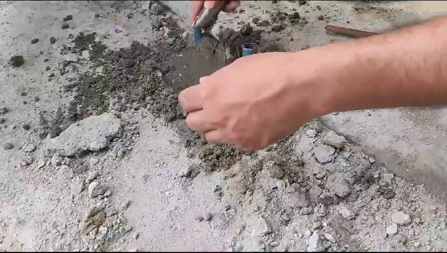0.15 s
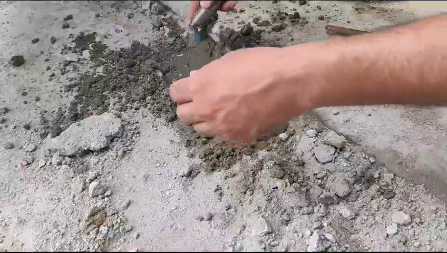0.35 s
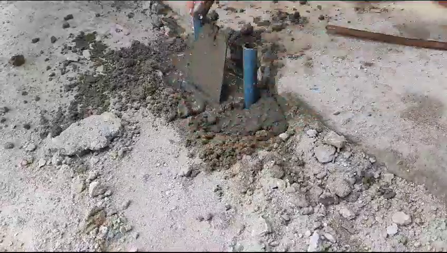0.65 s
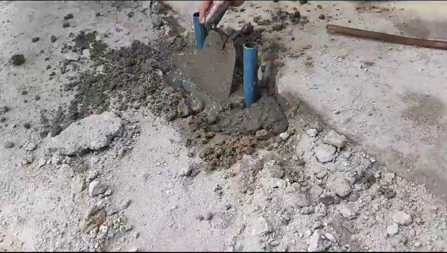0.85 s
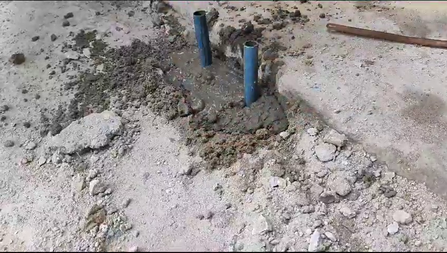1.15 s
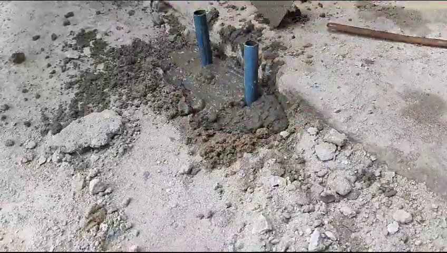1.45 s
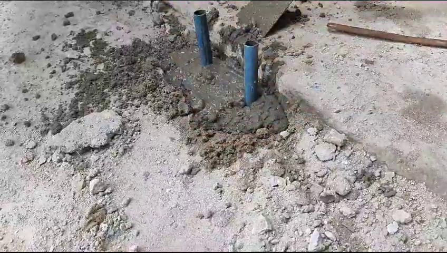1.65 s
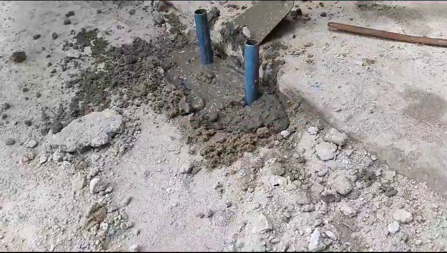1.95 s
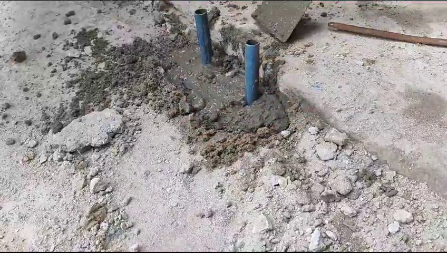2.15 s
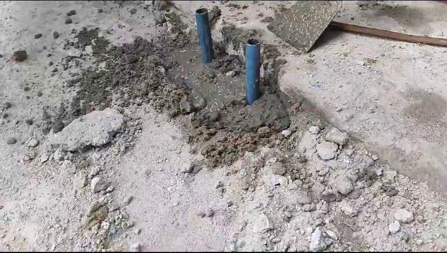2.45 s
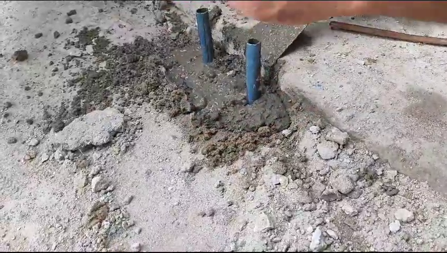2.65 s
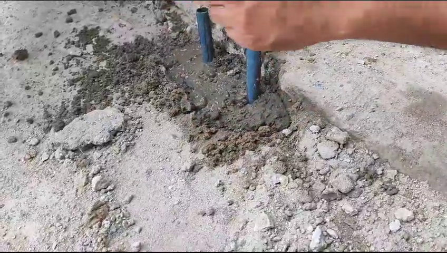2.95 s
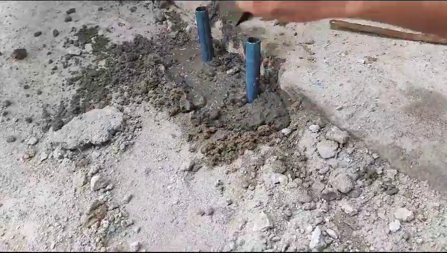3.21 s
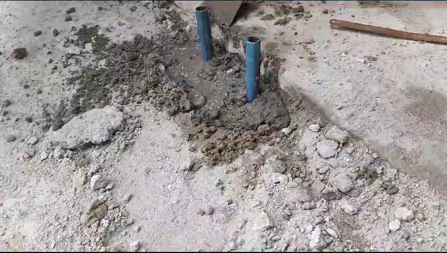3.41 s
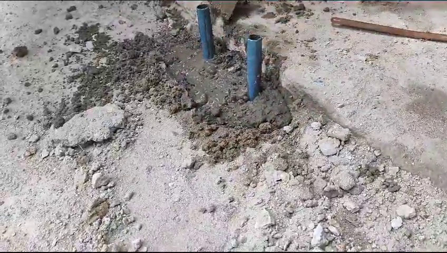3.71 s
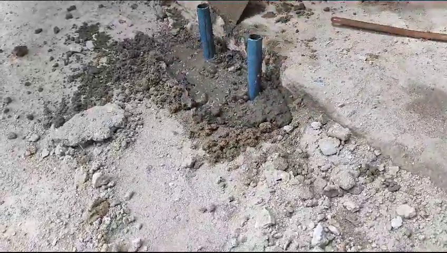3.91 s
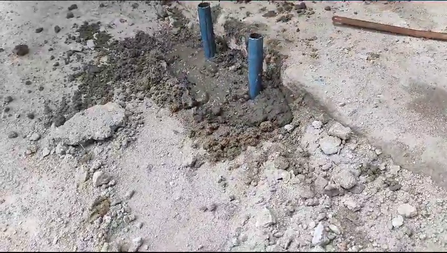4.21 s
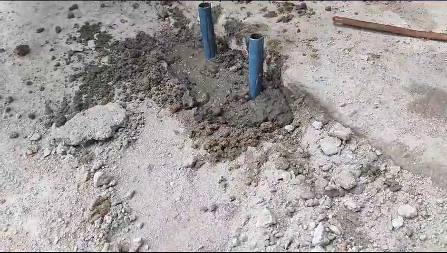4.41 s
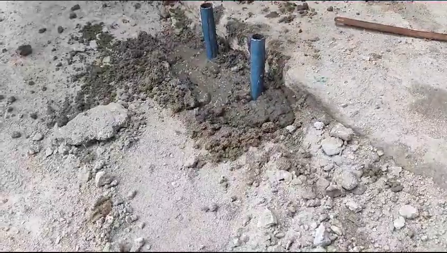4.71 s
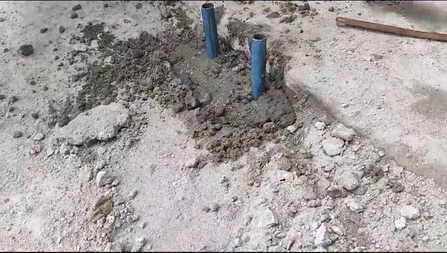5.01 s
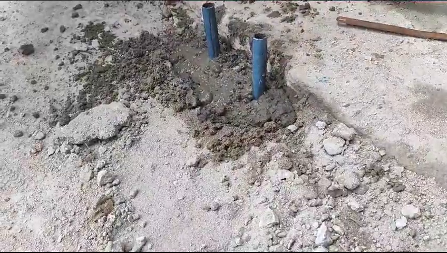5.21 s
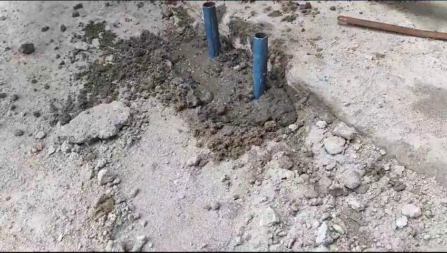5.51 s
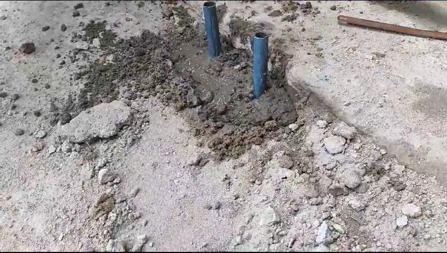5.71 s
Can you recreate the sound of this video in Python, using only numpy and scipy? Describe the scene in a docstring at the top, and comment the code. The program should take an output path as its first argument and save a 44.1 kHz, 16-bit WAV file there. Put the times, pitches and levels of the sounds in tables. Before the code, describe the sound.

Fine wet pats and sharp taps give way to ringing metal scrapes on concrete, then coarse scooping and hollow knocks in a tub.

```python
"""A small steel trowel pats wet mortar, scrapes a concrete floor, then scoops mortar in a tub.
Impulsive sand grains excite broad contact noise and the resonances of blade and tub; taps, lumps and
knocks are sharp pushes with decaying bursts. Narrow modes sing by stick and slip, and a hollow tone squelches.
Noise tails make a bare room; tiny clicks, microphone rumble, a brief hum and background air lie outside it."""
import sys
import numpy as np
from scipy import signal
from scipy.fft import rfft, irfft, next_fast_len
from scipy.io import wavfile
from scipy.ndimage import map_coordinates

SR = 44100
rng = np.random.default_rng(int(sys.argv[2]) if len(sys.argv) > 2 else 0)


def bounce(signal):
    """Save signal as a 16-bit WAV file at the path given by the first command-line argument."""
    frames = np.transpose(np.atleast_2d(signal))
    limited = np.clip(frames, -1, 1)
    pcm = np.round(limited * 32767).astype(np.int16)
    wavfile.write(sys.argv[1], SR, pcm)


N = 258426
SIZE = next_fast_len(N + SR)  # zero padding leaves room for ringing
HZ = np.fft.rfftfreq(SIZE, 1 / SR)
T = np.arange(N) / SR
SPLIT_HZ = 2800  # between the low body and the bright grit of a contact

# resonances of the steel blade: pitch_hz, half_width_hz, relative level_db
BLADE_MODES = [(588, 23, -1), (1069, 10.3, -14), (2208, 55, -5), (2623, 180, -6), (3180, 360, -8.5),
               (3458, 37, -4.5), (4125, 63, -5), (4886, 180, -1.5), (5200, 81, -16), (5595, 410, -5.5),
               (6993, 56, -1.5), (7760, 50, 0.5), (8000, 120, -32), (8760, 170, -5), (9950, 59, -10),
               (10690, 72, -4), (11350, 92, -9), (12100, 230, -11), (12800, 300, -27), (14000, 34, -28),
               (14480, 82, -6.5), (16400, 390, -6)]
# resonances of the tub: pitch_hz, half_width_hz, relative level_db
TUB_MODES = [(196, 190, -15), (630, 95, 8.5), (1574, 130, 1), (2145, 55, 1), (2703, 32, 0),
             (3120, 54, -8.5), (3543, 61, -5.5), (4180, 23, -7.5), (4710, 200, -25), (5440, 600, -8.5),
             (6000, 57, -3), (7800, 500, -10), (8360, 170, -7), (9630, 40, -43)]
# contact noise spectrum of wet mortar: frequency_hz, relative density_db (per Hz)
MORTAR_SPECTRUM = [(120, -29), (200, -11), (440, -14), (538, -3.5), (659, -12), (1080, -8), (1250, -9),
                   (2130, -7.5), (2470, -7), (2700, -4.5), (4520, -16.5), (7830, -2), (12200, -32.5),
                   (15100, -17), (16000, -11.5)]
# dull spectrum of a moving or falling load: frequency_hz, relative density_db (per Hz)
THUD_SPECTRUM = [(35, -45), (60, -22), (188, -3.5), (221, -8), (312, -7), (393, -19.5), (500, -12.5),
                 (650, -33), (1100, -120)]


def amp(db):
    """Amplitude ratio of a level in decibels."""
    return 10 ** (np.asarray(db) / 20)


def unit(x):
    """Power normalisation: scale to rms 1."""
    return x / np.sqrt(np.mean(np.abs(x) ** 2) + 1e-20)


def along(points, hz=HZ):
    """Logarithmic frequency scale: (Hz, value) points interpolated on it."""
    f, v = np.transpose(points)
    return np.interp(np.log(hz + 1), np.log(f + 1), v)


def wobble(rate):
    """Band-limited random modulation: a smooth curve through rate random knots a second."""
    knots = rng.standard_normal(int(N * rate / SR) + 4)
    return map_coordinates(knots, [T * rate])


def filtered(x, response):
    """Linear filtering: convolution is multiplication by a frequency response."""
    return irfft(rfft(x, SIZE) * response, SIZE)[..., :N]


def causal(gain):
    """Minimum phase: folding the cepstrum gives this gain a causal response, at unit power."""
    cepstrum = irfft(np.log(np.maximum(unit(gain), 1e-6)), SIZE)
    cepstrum[1:SIZE // 2] *= 2
    cepstrum[SIZE // 2 + 1:] = 0
    return np.exp(rfft(cepstrum))


def resonances(modes):
    """Modal superposition: powers of steep-skirted resonances add, normalised to unit power."""
    power = sum((amp(db) / (1 + ((HZ - centre) / half_width) ** 2)) ** 2 for centre, half_width, db in modes)
    return unit(np.sqrt(power))


def surface(spectrum, modes, ring_db):
    """Incoherent addition: broad contact noise plus the object's resonances."""
    return np.hypot(unit(amp(along(spectrum))), amp(ring_db) * resonances(modes))


def halves(gain, split_hz):
    """Crossover filtering: a gain parted into a low and a high response."""
    slope = (HZ / split_hz) ** 4
    return causal(gain / (1 + slope)), causal(gain * slope / (1 + slope))


def sand(rate, spread_db, hiss_db, judder_db):
    """Poisson-like shot noise: grains crushed at random, in clumps as the blade sticks and slips."""
    present = rng.random(N) < rate / SR  # rate is in grains per second
    sign = rng.choice([-1, 1], N)
    grains = present * sign * amp(spread_db * np.minimum(rng.exponential(size=N), 4))
    crackle = unit(grains) + amp(hiss_db) * rng.standard_normal(N)
    return unit(crackle * amp(judder_db * wobble(170)))


def pressure(table, ease_db, release):
    """Contact force envelope, one row a stroke: it bites, swells, eases off and lets go."""
    bite_s = 0.0032  # contact grows over this time before the start
    forces = []
    for start, swell, ease, swell_db, peak_db, *_ in table:
        t = T - start
        bite = np.clip(t / bite_s + 1, 0, 1)
        lift = np.exp(-np.clip((t - swell - ease) / release, 0, 20))
        below_peak_db = np.interp(t, [0, swell, swell + ease], [swell_db, 0, ease_db])
        forces.append(bite * lift * amp(peak_db - below_peak_db))
    return np.array(forces)


def strokes(force, grit_over_db, gain, grit, body_db, grit_db):
    """Source-filter principle: crushed grains drive the low body and the bright grit of a contact."""
    low, high = halves(gain, SPLIT_HZ)
    body_force = force.sum(axis=0)
    grit_force = amp(grit_over_db) @ force
    body = amp(body_db) * filtered(body_force * grit, low)
    bright = amp(grit_db) * filtered(grit_force * grit, high)
    return body + bright


def blows(times, levels, t60, crack_db):
    """Impulsive excitation: each blow is one sharp push and a short decaying burst of crushing."""
    out, t = np.zeros(N + SR), np.arange(SR // 5) / SR
    for s, db in zip(times, levels):
        at = round(s * SR)
        out[at:][:len(t)] += amp(db - 60 * t / t60) * rng.choice([-1, 1], len(t))
        out[at] += amp(db + crack_db)
    return out[:N]


def singing(force, song_db, modes):
    """Stick-slip excitation: friction along the blade keeps a few modes ringing."""
    slips = sand(rate=1500, spread_db=3, hiss_db=-8, judder_db=3.5)
    return filtered(amp(song_db) @ force * slips, causal(resonances(modes)))


def patting():
    """Damped granular contact: wet mortar fizzes finely under the flat blade and damps its ring."""
    # strokes: start_s, swell_s, ease_s, swell_db (below peak), drive peak_db, grit_db (over peak)
    pats = [ (0.0, 0.011, 0.097, -3, -52.5, -1.5), (0.144, 0.041, 0.011, 15, -42, -5.5),
            (0.22, 0.054, 0.006, 9, -56, 1), (0.398, 0.02, 0.021, 3.5, -41, 4.5),
            (0.45, 0.057, 0.046, 4, -63, 4.5), (0.759, 0.12, 0.071, 6.5, -49, -2),
            (0.905, 0.0094, 0.038, 6, -44, 1.5), (0.96, 0.056, 0.018, 4.5, -54, -1),
            (3.895, 0.011, 0.11, -1, -51.5, -5.5), (4.21, 0.025, 0.13, 0, -68, 1.5), ]
    force = pressure(pats, ease_db=12.5, release=0.0065)
    grit_over_db = np.transpose(pats)[-1]
    grit = sand(rate=3500, spread_db=1.5, hiss_db=-2.0, judder_db=0.0)
    gain = surface(MORTAR_SPECTRUM, BLADE_MODES, ring_db=-1.5)
    return strokes(force, grit_over_db, gain, grit, body_db=-2.5, grit_db=-2.0)


def air():
    """Partially correlated noise: one shared and two separate parts make the room's faint background."""
    # background spectrum: frequency_hz, relative density_db (per Hz)
    air_spectrum = [(15, -44), (25, -16), (102, -6), (153, -29.5), (236, -29), (1130, -41), (1650, -17),
                    (1890, -22.5), (2910, -21.5), (3620, -25), (16000, -42.5)]
    noise = rng.standard_normal(N) + 2.0 * rng.standard_normal((2, N))
    return amp(-69.0) * unit(filtered(noise, amp(along(air_spectrum))))


def humming():
    """Narrow-band resonance: filtered noise makes a faint hollow hum that stops early."""
    pitch_hz, level_db, end_s = 620, -77.5, 1.38
    hum = unit(filtered(rng.standard_normal(N), causal(resonances([(pitch_hz, 35, 0)]))))
    return amp(level_db) * hum * np.clip((end_s - T) / 0.05, 0, 1)


def handling():
    """Structure-borne noise: the grip shifts in soft lumps over a tremor, mostly on the right port."""
    # shifts of the grip: peak_s, drive level_db
    nudges = [(0.019, -42), (0.19, -45), (0.27, -46), (0.43, -49), (0.545, -44), (0.79, -45.5), (0.97, -45),
              (1.099, -48), (1.429, -38.5), (1.55, -42), (1.71, -47), (2.07, -49), (2.379, -46),
              (2.489, -42.5), (2.68, -51.5), (2.92, -55), (3.29, -51.5), (3.48, -57.5), (3.96, -53),
              (4.06, -52)]
    # handling spectrum: frequency_hz, relative density_db (per Hz)
    rumble_spectrum = [(12, -51), (20, -10.5), (91, 3), (119, -2), (138, -1), (166, -8.5), (211, -17.5),
                       (400, -27.5), (520, -66), (880, -120)]
    rise_s, fall_s = 0.018, 0.059  # exponential time constants
    grip = amp(-61 - 2 * T)  # the hand grows steadier by 2 dB a second
    for s, db in nudges:
        bump = np.exp(-np.maximum((s - T) / rise_s, (T - s) / fall_s))
        grip = np.maximum(grip, amp(db) * bump)
    noise = rng.standard_normal(N) + 1.78 * rng.standard_normal((2, N))
    lumps = unit(filtered(noise, amp(along(rumble_spectrum))) * amp(1.0 * wobble(25.14)))
    return lumps * grip * amp([[-7], [3]])  # left and right gains, dB


def tapping():
    """Impact excitation of modes: the blade's edge strikes stones in the mix."""
    # strikes: time_s, drive peak_db, body_db (relative to peak)
    taps = [(0.175, -27, 2), (0.1847, -28.5, 1), (0.6515, -40, 1), (0.6579, -20.5, -1.5), (0.9038, -29, -8),
            (1.5757, -43.5, 2), (1.6721, -24.5, -20), (1.8504, -40.5, 1), (2.0006, -32, -18),
            (2.1495, -34.5, -5.5), (2.305, -32.5, -11), (2.4823, -42, -8), (2.5719, -28.5, -8),
            (2.6653, -25, 1.5), (2.7868, -34, -11), (2.9044, -32, -10), (3.252, -27.5, 0.5),
            (3.5073, -26, -32), (3.8671, -29.5, 5), (4.0285, -27, -1.5), (4.069, -39, -16),
            (5.0436, -25, 1), (5.0606, -38, 13), (5.549, -45, 9), (5.6153, -34, 17)]
    s, db, body_db = np.transpose(taps)
    low, high = halves(surface(MORTAR_SPECTRUM, BLADE_MODES, ring_db=-1), SPLIT_HZ)
    body = blows(s, db + body_db - 15.5, t60=0.087, crack_db=18.0)
    crack = blows(s, db - 6.0, t60=0.044, crack_db=17)
    return filtered(body, low) + filtered(crack, high)


def landing():
    """Damped inelastic impact: heavy lumps of mortar land with a dull thud."""
    # landings: time_s, drive level_db
    lumps = [(0.178, -41.5), (0.415, -48.5), (4.778, -42), (5.063, -34), (5.315, -27), (5.329, -34),
             (5.772, -42)]
    thuds = blows(*np.transpose(lumps), t60=0.091, crack_db=-9)
    return filtered(thuds, causal(amp(along(THUD_SPECTRUM))))


def knocking():
    """Modal impact response: the blade or a lump bumps the tub, with a dull boom and a higher slap."""
    # bumps: time_s, drive peak_db, slap_db (relative to peak)
    knocks = [(0.42, -30, -36), (3.867, -31, 1), (4.03, -23, -5), (4.234, -57, 8), (4.728, -35, 16),
              (5.044, -33.5, 8.5), (5.315, -13, -17.5), (5.38, -14, -7), (5.414, -17, -2.5),
              (5.425, -31, -3), (5.749, -31.5, 10), (5.775, -20.5, -7)]
    # broad spectrum of a bump: frequency_hz, relative density_db (per Hz)
    boom_spectrum = [(47, -42.5), (80, -23), (201, -19), (349, -5.5), (587, 3), (702, -1.5), (1110, -9),
                     (1540, 6), (1870, -11.5), (2800, -19), (3640, -35), (6160, -120)]
    s, db, slap_db = np.transpose(knocks)
    low, high = halves(surface(boom_spectrum, TUB_MODES, ring_db=-5.0), 860)
    boom = blows(s, db - 17.5, t60=0.069, crack_db=27)
    slap = blows(s, db + slap_db - 7.0, t60=0.061, crack_db=15.5)
    return filtered(boom, low) + filtered(slap, high)


def clicking():
    """Strongly damped resonance: tiny bright clicks, too close to wake the room."""
    # clicks: time_s, drive peak_db, pitch_hz, top_partial_db (relative to the lower resonance)
    clicks = [(1.1716, -31, 4360, -2), (1.2304, -37, 4380, -2), (1.578, -39, 3800, -16),
              (1.925, -38, 3220, -18), (4.554, -44.5, 2400, -37)]
    out = np.zeros(N)
    for s, db, hz, top_db in clicks:
        push = blows([s], [db - 9], t60=0.0096, crack_db=8)
        modes = [(hz, 0.31 * hz, 0), (14700, 700, top_db)]
        out += filtered(push, causal(resonances(modes)))
    return out


def scraping():
    """Friction-driven vibration: dry concrete makes the blade sing on its edge and when laid flat."""
    # strokes: start_s, swell_s, ease_s, swell_db (below peak), drive peak_db,
    # then over the peak: grit_db, edge_song_db, flat_song_db
    scrapes = [ (1.3, 0.318, 0.021, 22.5, -53, -2, -28, -21), (1.627, 0.14, 0.022, 8, -45, 4.5, -16, -13),
               (1.841, 0.046, 0.013, 5.5, -58.5, 6, -11, -18),
               (2.001, 0.056, 0.067, 6.5, -45.5, 7, -5.5, -13.5),
               (2.305, 0.041, 0.01, 3, -42.5, 3, -7, -12.5), (2.485, 0.006, 0.029, -2, -67, 0, 10.5, -10),
               (2.568, 0.1, 0.052, 13, -42.5, 7, 3.5, -5.5), (2.788, 0.044, 0.019, -1.5, -51, 2, 7, -12),
               (2.866, 0.064, 0.073, 12, -43, 3, -2, -9.5), (3.181, 0.052, 0.006, 19, -56.5, -1.5, -17, -7),
               (3.243, 0.023, 0.12, 0.5, -43.5, 4, -18.5, -3), (3.488, 0.027, 0.079, 7, -43, 7.5, -22, -3),
               ]
    # contact noise of concrete: frequency_hz, relative density_db (per Hz)
    concrete_spectrum = [(150, -83), (250, -16.5), (436, -17), (557, -5), (831, -14.5), (1080, -6),
                         (2440, -5.5), (2670, 1.5), (3840, -27), (4900, -18), (6360, -15), (7700, 6.5),
                         (9330, -13.5), (15200, -25), (16000, -35)]
    # modes kept ringing by the juddering edge: pitch_hz, half_width_hz, relative level_db
    edge_modes = [(610, 28, -8), (1081, 48, 0), (2176, 32, 5), (4760, 31, -1)]
    # modes of the flat blade: pitch_hz, half_width_hz, relative level_db
    flat_modes = [(559, 45, 2), (2690, 77, -11)]
    force = pressure(scrapes, ease_db=9.5, release=0.0032)
    *_, grit_over_db, edge_db, flat_db = np.transpose(scrapes)
    grit = sand(rate=1200, spread_db=4.0, hiss_db=-7, judder_db=2.6) * amp(1.2 * wobble(40))
    gain = surface(concrete_spectrum, BLADE_MODES, ring_db=1.5)
    rasp = strokes(force, grit_over_db, gain, grit, body_db=-2.5, grit_db=-1.5)
    return rasp + singing(force, edge_db, edge_modes) + singing(force, flat_db, flat_modes)


def squelching():
    """Cavity resonance: a pocket opens in wet mortar ahead of the blade and its fuzzy tone glides down."""
    # glide of the pocket's tone: time_s, pitch_hz, level_db
    squelch = [(1.5, 850, -78), (1.56, 790, -66), (1.62, 740, -63), (1.68, 680, -60), (1.751, 544.5, -55),
               (1.81, 507, -63)]
    s, hz, db = np.transpose(squelch)
    phase = 2 * np.pi * np.cumsum(np.interp(T, s, hz)) / SR
    # random quadrature amplitudes blur the tone
    tone = wobble(110) * np.sin(phase) + wobble(110) * np.cos(phase)
    fade = np.exp(-np.abs(T - np.clip(T, s[0], s[-1])) / 0.012)
    return unit(tone) * amp(np.interp(T, s, db)) * fade


def scooping():
    """Granular friction: the blade grinds coarse clumps along the tub's wall as the load shifts."""
    # strokes: start_s, swell_s, ease_s, swell_db (below peak), drive peak_db,
    # then over the peak: grit_db, song_db, shifting_load_db
    scoops = [ (4.588, 0.0062, 0.085, -3, -36.5, -1, -4.5, -6.5),
              (4.66, 0.06, 0.019, 8.5, -34.5, 1.5, 4.5, -6.5),
              (4.759, 0.015, 0.29, -5, -44.5, -13.5, -25, 0), (5.018, 0.006, 0.014, 2, -42, 6, -12, -10),
              (5.043, 0.0034, 0.038, 1.5, -35.5, 0, 1, -7), (5.1, 0.098, 0.023, 8.5, -39.5, -6.5, -14, -6),
              (5.248, 0.061, 0.088, 17.5, -40, 1, -8, -11.5),
              (5.397, 0.03, 0.014, 11.5, -29.5, -4, -14, -19),
              (5.46, 0.023, 0.12, 9, -45.5, -9, -23, -14.5),
              (5.615, 0.007, 0.053, -1, -35.5, -5.5, -8, -14),
              (5.686, 0.057, 0.052, 14, -31.5, -4, -6, -17), ]
    # contact noise of loose wet mortar: frequency_hz, relative density_db (per Hz)
    slurry_spectrum = [(150, -40), (250, -2), (407, -19), (618, -9), (906, -5), (1580, -6), (1820, -7.5),
                       (2130, -4.5), (2860, -9), (3520, -12), (3910, -21), (5440, -15), (8700, -18.5),
                       (11900, -30), (16000, -23.5)]
    # modes kept ringing by the juddering edge: pitch_hz, half_width_hz, relative level_db
    edge_modes = [(1220, 96, -4), (1470, 100, -1.5), (1548, 80, 2), (2370, 74, -5)]
    force = pressure(scoops, ease_db=9, release=0.0086)
    *_, grit_over_db, song_db, load_db = np.transpose(scoops)
    grit = sand(rate=1100, spread_db=3.8, hiss_db=-7, judder_db=2.4)
    gain = surface(slurry_spectrum, TUB_MODES, ring_db=-2.5)
    grind = strokes(force, grit_over_db, gain, grit, body_db=-5.0, grit_db=-1.5)
    load = amp(load_db) @ force * rng.standard_normal(N)
    shifting_load = filtered(load, causal(amp(along(THUD_SPECTRUM))))
    return grind + singing(force, song_db, edge_modes) + shifting_load


def wavering(x):
    """Frequency modulation by varying delay: the blade bends under the hand and its ring wavers."""
    bend_s = 0.00012 * wobble(45)
    return map_coordinates(x, [(T + bend_s) * SR])


def echo(t60):
    """Exponential reverberant decay: two unrelated unit-energy noise tails; t60 is (Hz, s) points."""
    hz, t, z = signal.stft(rng.standard_normal((2, SR * 3 // 4)), SR, nperseg=256)
    decay = amp(-60 * t / along(t60, hz)[:, None])
    tail = signal.istft(z * decay, SR, nperseg=256)[1]
    tail = tail * np.minimum(np.arange(tail.shape[1]) / SR / 0.0011, 1)  # soft onset
    return rfft(tail / np.linalg.norm(tail[0]), SIZE)


def room(x, near_db, tail_db, near_t60):
    """Diffuse-field decorrelation: near surfaces widen the sound, bare walls ring on; bass stays alike."""
    # reverberation of the bare room: frequency_hz, t60_s
    reverberation = [(150, 0.26), (500, 0.44), (2500, 0.42), (7000, 0.3), (14000, 0.23)]
    apart = np.minimum(HZ / 1800, 1)
    tail = amp(tail_db) * echo(reverberation)
    near = amp(near_db) * echo([(1000, near_t60)])[0]
    mid = 1 + tail[0]
    side = apart * (tail[1] + near)
    return filtered(x, np.array([mid + side, mid - side]))


def shifting(x, colour_db, beam_db, life):
    """Directivity of a moving source: colour drifts and treble beams now to one port, now the other."""
    hz, t, z = signal.stft(x, SR, nperseg=256)
    grid = np.meshgrid(np.sqrt(hz) / 3, t / life, indexing="ij")  # life is in seconds
    fields = rng.standard_normal((2, 64, 160))
    colour, beam = [map_coordinates(field, grid, mode="wrap") for field in fields]
    treble = np.minimum(hz / 2500, 1)[:, None]
    gain = amp(treble * (colour_db * colour + beam_db * np.array([beam, -beam])))
    gain = gain / np.sqrt(np.mean(gain ** 2, axis=2, keepdims=True))  # mean power 1 over time
    return signal.istft(z * gain, SR, nperseg=256)[1][:, :N]


def scene():
    """Superposition: floor and tub sounds, each with its own reverberation, plus sounds outside the room."""
    # colour of the microphone ports, left minus right: frequency_hz, difference_db
    port_difference = [(200, 0), (700, -1), (1300, 1), (2400, 5), (4400, 3.5), (6000, 8.5), (7100, 4),
                       (8200, -17.5), (9500, -5.5), (11000, -3), (13000, 6), (15000, 3.5)]
    floor = wavering(patting() + scraping()) + squelching() + tapping()
    tub = wavering(scooping() + landing()) + knocking()
    floor_wet = room(floor, near_db=-0.5, tail_db=-7.5, near_t60=0.021)
    tub_wet = room(tub, near_db=0.0, tail_db=-7, near_t60=0.053)
    moving = shifting(floor_wet + tub_wet, colour_db=2.5, beam_db=3, life=0.07)
    difference_db = along(port_difference)
    ports = amp(np.array([difference_db, -difference_db]) / 2)
    ports = ports / np.sqrt(np.mean(ports ** 2, axis=0))
    return filtered(moving, ports) + clicking() + handling() + air() + humming()


def record(dry):
    """Band limitation: a very steep low-pass removes the extreme treble."""
    top_hz = 15900
    return filtered(dry, 1 / (1 + (HZ / top_hz) ** 200))


dry = scene()
out = record(dry)
bounce(out)
```